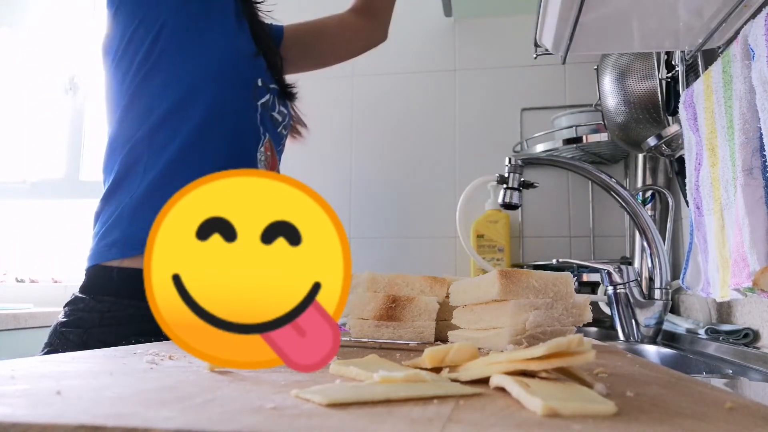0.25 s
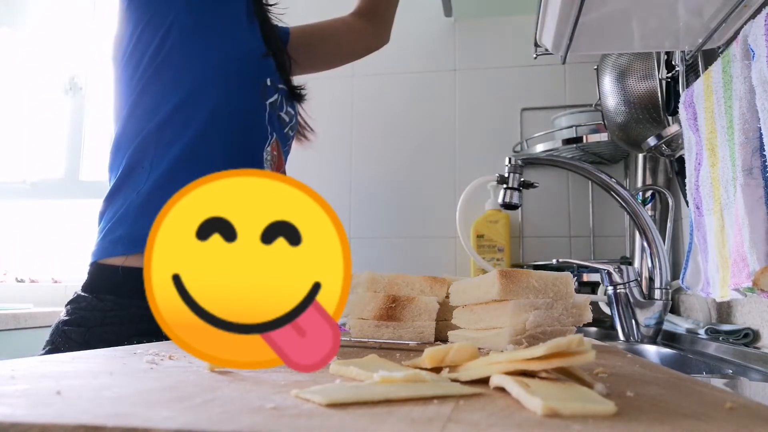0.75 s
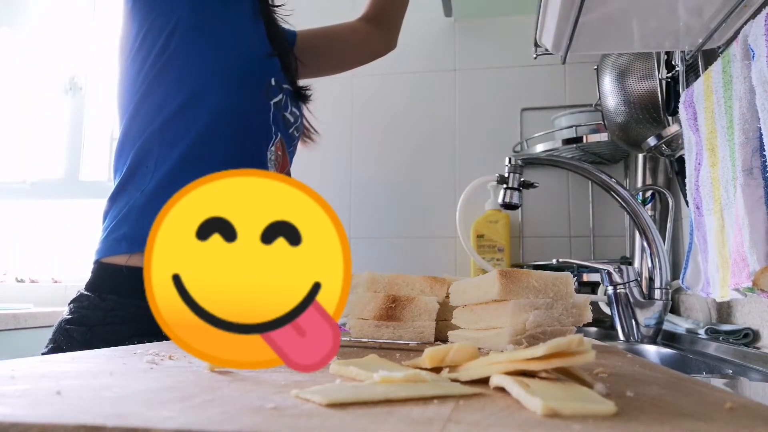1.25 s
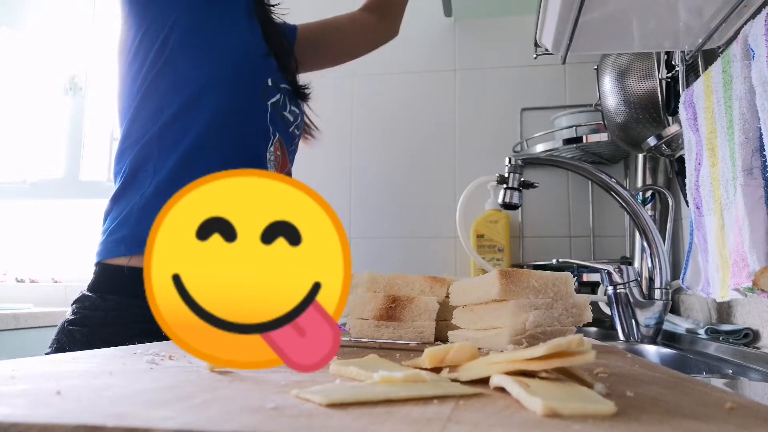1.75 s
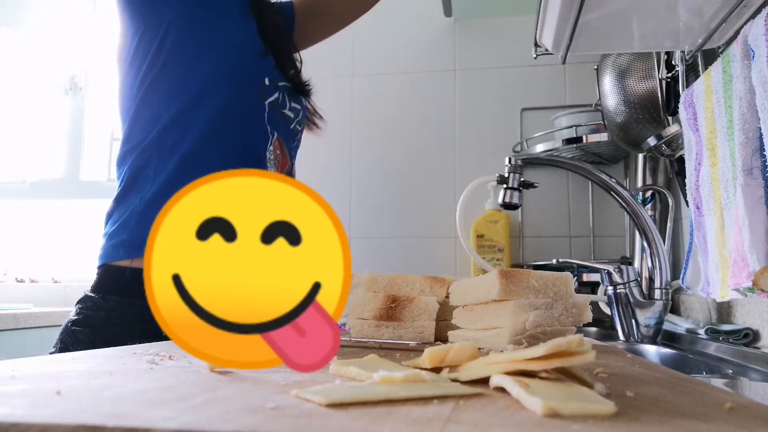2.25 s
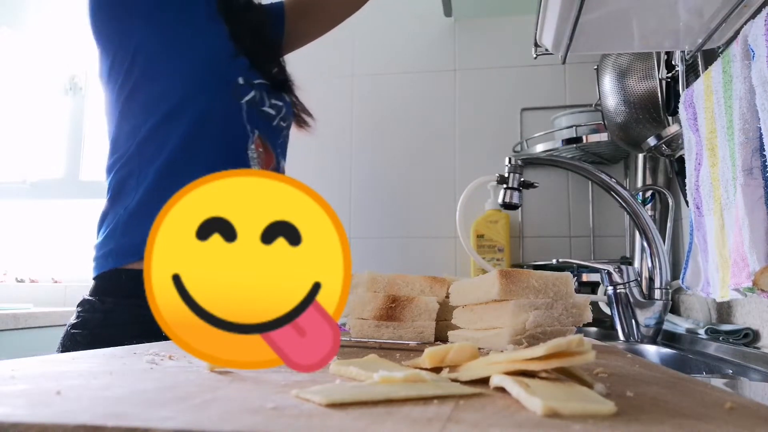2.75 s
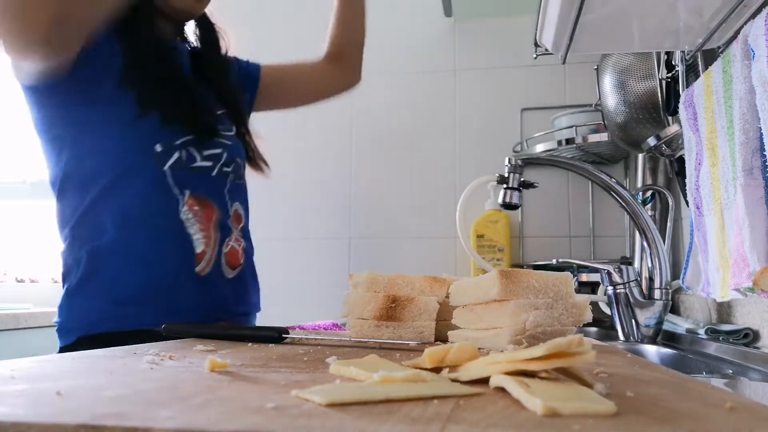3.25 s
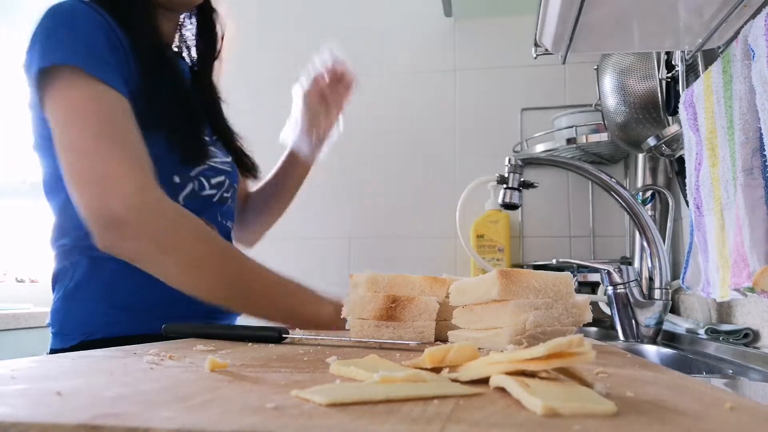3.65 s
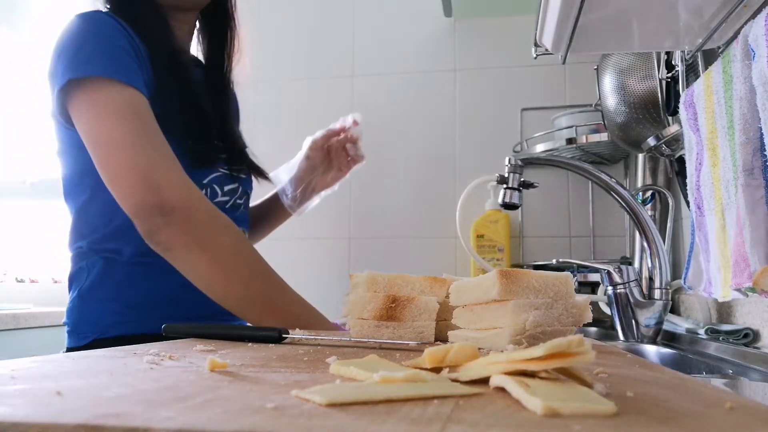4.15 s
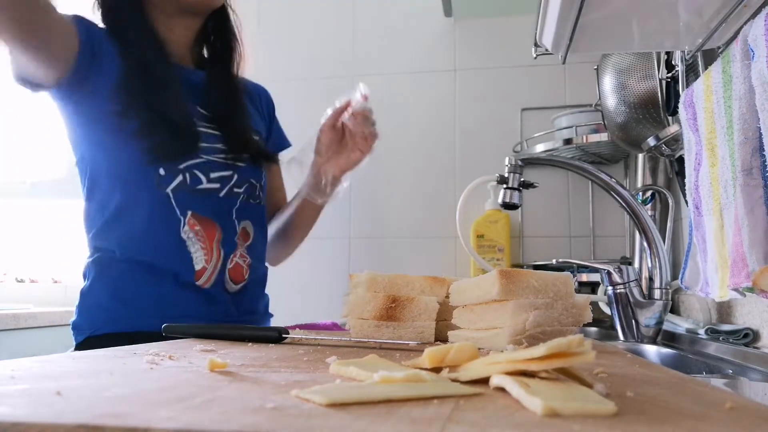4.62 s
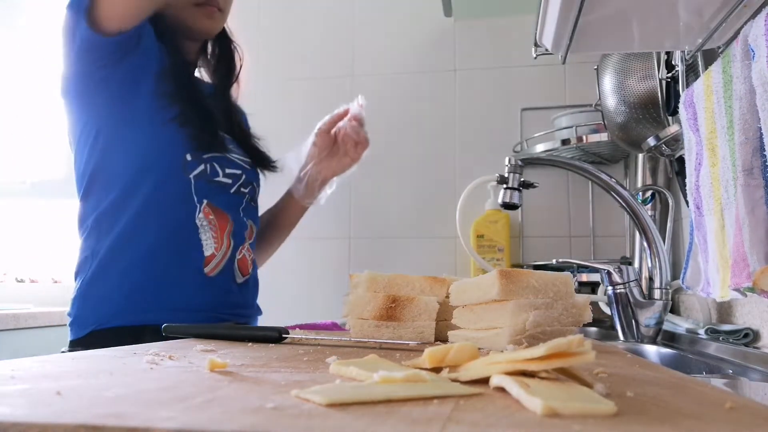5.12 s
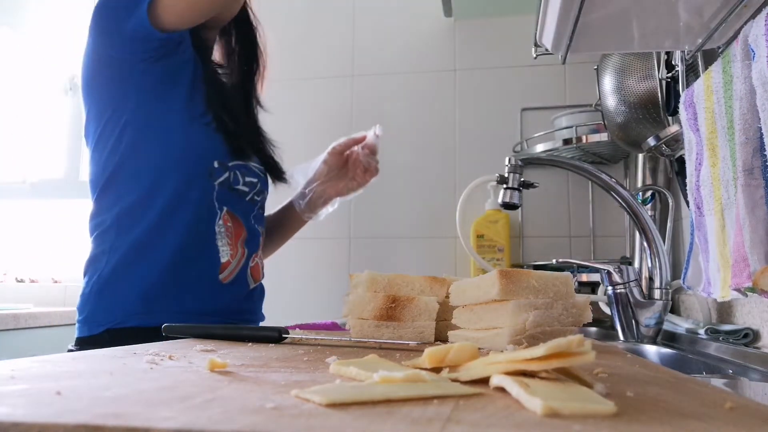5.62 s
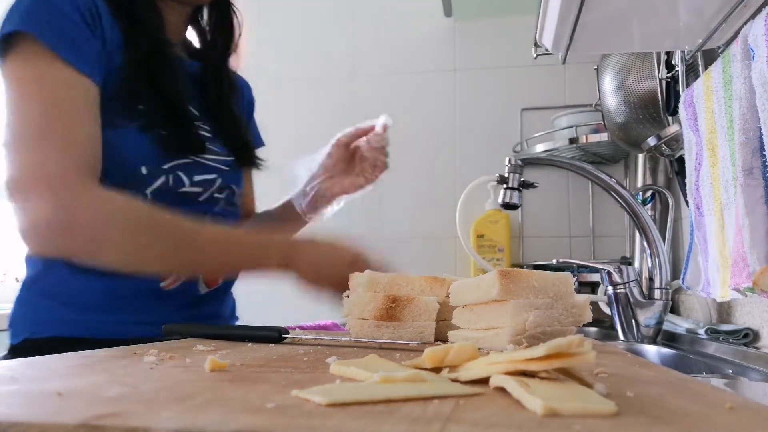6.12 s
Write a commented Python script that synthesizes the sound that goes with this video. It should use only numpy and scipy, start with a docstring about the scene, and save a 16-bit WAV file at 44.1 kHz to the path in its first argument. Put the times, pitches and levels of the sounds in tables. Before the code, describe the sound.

In a tiled home kitchen, metal clatters and rings free of a rack, is set down on wood, followed by clicks, knocks and glove rustle.

```python
"""Steel utensil in a tiled kitchen

A steel utensil is jostled in an overhead rack, drawn out singing and laid on a wooden board.
A shelf is bumped, a china dish nudged, something clicks, a cupboard door knocks, a thin plastic glove rustles.
Blows are chattering contacts on resonant bodies; slides and rustles are streams of tiny slips.
An appliance adds rushing air, a thin hiss and a low hum.
The blows, slides and rustles reach two microphones mostly by way of the walls."""
import sys
import numpy as np
from scipy import signal
from scipy.fft import rfft, irfft
from scipy.io import wavfile
from scipy.ndimage import uniform_filter1d, map_coordinates

SR = 44100
rng = np.random.default_rng(int(sys.argv[2]) if len(sys.argv) > 2 else 0)


def dump(signal):
    """Clip the signal to [-1, 1] and save it as 16-bit WAV at the path in sys.argv[1]."""
    limited = np.clip(np.atleast_2d(signal).T, -1, 1)
    pcm = np.round(limited * 32767).astype(np.int16)
    wavfile.write(sys.argv[1], SR, pcm)


N = 281358  # length in samples

# All levels in the tables are relative: body shapes are scaled to unit energy, layers have trims of their own.

# decay of the tiled walls: f/Hz, t60/s
WALL_DECAY = [(60, 0.99), (200, 0.43), (600, 0.4), (1500, 0.33), (4000, 0.33), (8000, 0.29), (14000, 0.2)]
# stereo balance over frequency, to which each path adds its pan: f/Hz, left minus right/dB
STEREO_LEAN = [(60, 2.5), (150, -7), (300, -6.5), (600, -7.5), (1200, 0), (3000, -6), (5200, 2.5),
               (9000, 1), (12000, -12.5)]
MIC_SPACING_M, TAIL = 0.17, 24000  # TAIL: length of the room's echo in samples
EDGE_HZ = 15200  # upper band limit

# rushing air of the still room: f/Hz, level/dB
AIR_COLOUR = [(12, -42), (20, -5.5), (102, -10), (119, -12), (149, 5.5), (201, -14.5), (216, -10.5),
              (292, -7.5), (315, -14), (366, -10), (520, -10), (561, -17), (703, -12), (1250, -24.5),
              (8000, -45), (10400, -126), (17600, -120)]
# thin steady hiss: f/Hz, level/dB
WHINE_COLOUR = [(20, -51), (8500, -22), (8950, 9.5), (9200, 15.5), (9500, 6), (9900, 1), (12000, -29),
                (15000, -4)]
AIR_DB, WHINE_DB = -47, -72
# the appliance's motor tones: f/Hz, level/dB
HUM_TONES = [(100, -62.5), (146, -72.5), (194, -58.5), (292, -58.5)]

# movements of the gloved hand: t/s, level/dB, attack/s, release/s
GLOVE_GESTURES = [(0.0, -57, .01, 0.28), (1.56, -71, 0.13, 0.34), (1.91, -58.5, 0.19, 0.44),
                  (2.2, -63, 0.11, 0.23), (3.09, -63.5, 0.094, .7), (3.35, -71, .1, 2),
                  (6.0, -70.5, 0.18, 1.1), (6.117, -39.5, 0.04, 0.094)]
# colour of crinkling plastic: f/Hz, level/dB
CRINKLE_COLOUR = [(200, -17), (600, 8.5), (1500, -1.5), (3000, 0), (5500, -2), (8000, -5), (11000, -1.5),
                  (13000, -14.5), (15000, -16)]
GLOVE_REST_DB, GLOVE_HANDLING_DB, GLOVE_TRIM_DB = -74, -50, 1  # it never lies quite still

# blows, one table for each thing: t/s, level/dB, chatter/s, bass tilt/dB, treble tilt/dB
SHELF_BLOWS = [(1.8325, -20.5, 0.0052, 5.5, 8), (1.891, -27.5, 0.0039, -4.5, 8),
               (1.938, -56, 0.0027, -12, -8), (2.018, -21.5, 0.0042, -11, -30)]
DOOR_BLOWS = [(0.012, -25.5, 0.023, -12, -6.5), (1.317, -37.5, 0.0046, 7.5, -8),
              (1.539, -45.5, 0.0027, 17, -36), (3.097, -42.5, 0.0093, 6, 2), (3.240, -46, 0.0011, 0, -29),
              (5.467, -15, 0.0057, -3.5, 1.5), (5.620, -42, 0.013, -8, 23), (5.634, -17, 0.0091, 4, 8.5),
              (5.69, -36.5, 0.045, 11, -22)]
CHINA_BLOWS = [(2.832, -40.5, 0.0061, 0.0014, -22), (2.872, -31, 0.0034, 0, 6.5),
               (2.896, -30, 0.0045, 0, 2), (2.937, -37.5, 0.0017, 0.0049, -1)]
CLICK_BLOWS = [(4.843, -33.5, 0.011, 0, 1), (4.8475, -29, 0.0072, 0, -0.5)]
# small hollow tick just before the click, same columns
TICK_BLOWS = [(4.8155, -35.5, 0.0021, -2, -14)]
# resonances of shelf, door, china and tick: f/Hz, width/Hz, level/dB
SHELF_RINGS = [(112.4, 4.8, 2), (238, 9.3, 2.5), (308.7, 14, -2), (434, 71, -12), (532, 36, 2),
               (642, 12, -14)]
DOOR_RINGS = [(105.4, 11, 7.5), (300, 95, 5), (368, 20, 12.5), (445, 130, 5.5), (650, 49, 8.5),
              (896, 29, 2), (1240, 160, -23), (1310, 62, -14.5), (1440, 46, -13), (2140, 130, -11)]
CHINA_RINGS = [(546, 130, 1), (870, 130, -5), (1090, 37, -1.5), (1800, 5.5, -3), (3030, 6.6, -15.5),
               (4500, 42, -34)]
TICK_RINGS = [(1183, 44, 7), (1300, 70, -20)]
# broad colour of shelf, door, china and click: f/Hz, level/dB
SHELF_COLOUR = [(40, -30), (75, -11), (105, 0), (170, -15), (250, 9.5), (400, -8), (640, -2), (800, -26),
                (1100, -23.5), (2500, -34), (5000, -55), (12000, -94)]
DOOR_COLOUR = [(30, -18), (60, -17.5), (105, -3), (190, -10.5), (300, -20.5), (480, -3), (650, -5.5),
               (920, -6), (1650, -16.5), (2500, -28), (3700, -34.5), (4800, -48), (7300, -49.5),
               (15000, -81)]
CHINA_COLOUR = [(100, -17), (400, -3), (600, 7), (1100, -1), (1600, -38), (4000, -42), (10000, -66)]
CLICK_COLOUR = [(410, -8.5), (700, -6), (1070, -4), (1670, -9.5), (2560, 2), (3480, -7), (4920, -4.5),
                (7220, -11.5), (8980, -22), (11300, -23.5), (15000, -55)]

# the utensil lands on the board and is shoved into place: t/s, blow level/dB, drag level/dB, drag hold/s
BOARD_SHOVES = [(4.028, -18.5, -28.5, 0.048), (4.234, -25, -34, 0.042), (4.307, -24, -28.5, 0.016),
                (4.398, -28, -30, 0.022)]
# resonances of the wooden board: f/Hz, width/Hz, level/dB
BOARD_RINGS = [(34, 9.4, -12), (100, 6.9, 4), (296, 23, 9.5), (357, 71, 3), (429, 19, 3), (538, 10, 2.5),
               (802, 28, -5), (923, 52, -12), (1167, 40, -12)]
# broad knock of the board: f/Hz, level/dB
BOARD_COLOUR = [(12, -42), (20, -3), (64, -44), (103, -12), (235, -32), (286, 10), (328, -17), (421, 1),
                (484, -24), (525, -1), (587, -10.5), (1050, -24), (1140, -19.5), (10800, -35), (15000, -53)]
# steel dragged on wood: f/Hz, level/dB
DRAG_COLOUR = [(100, -6), (200, -4.5), (320, -5), (560, -1.5), (1100, -10), (2000, -17), (5000, -26.5),
               (10500, -37), (15000, -57)]
# rumble of the worktop: f/Hz, level/dB
COUNTER_COLOUR = [(15, -7), (30, -3), (55, -23), (105, -7), (170, -20.5), (400, -40), (1500, -68)]
SHOVE_CHATTER_S, DRAG_ATTACK_S, DRAG_RELEASE_S = 0.0052, 0.004, 0.31
SHOVE_BASS_DB, SHOVE_TREBLE_DB = 3, -1
SETTLE_S, SETTLE_DB, SETTLE_TREBLE_DB = 0.036, -5, -33  # then the handle comes down, later and duller
HANDLING_S, HANDLING_RELEASE_S = 0.434, 0.21  # the hand stays on it this long after the landing
HANDLING_SLIP_DB, WORKTOP_DB = -40, -35

# modes of the utensil: f/Hz, width/Hz, clatter level/dB, edge-tap level/dB, slide level/dB
STEEL_RINGS = [(1076, 380, 7, -2, 8), (1358, 50, -3, -48, 10), (2175, 42, -26, -13, 12.5),
               (2209, 28, 5.5, 2.5, 9), (3120, 50, 4, -24, -11), (3380, 19, 0, 10.5, 12.5),
               (3475, 14.3, 3, 14.5, 5), (3686, 38, -4.5, 3, -21), (3803, 50, 4, -6, -16),
               (4540, 25, -1, -58, 2.5), (4620, 79, 3.5, -27, -11), (5120, 36, 0.5, 3, 11),
               (4800, 17, -34, -27, -45), (6540, 29, 1, -35, -21), (6920, 35, -4, -22, -29),
               (7190, 19, 0, -5, -3), (7250, 25, -28, -28, -18), (8560, 33, -8.5, -21, -21),
               (9600, 29, -7.5, -13, -7.5), (9860, 16, -14, -19, -23), (10650, 120, -19.5, -25, -13),
               (11200, 33, -43, -30, -16), (12110, 31, -21, -26, -18), (12850, 17, -39, -34, -31),
               (13850, 40, -48, -51, -44)]
# bare contact of steel: f/Hz, level/dB
CLACK_COLOUR = [(300, -35.5), (900, 20), (1700, 14.5), (2700, 9.5), (3700, 2), (4200, -36), (5400, 4),
                (7400, -15), (8100, -53), (10500, -48), (12500, -38), (13400, -106)]
# broad knock of the rack: f/Hz, level/dB
RACK_COLOUR = [(30, -43), (70, -20), (110, -3.5), (190, -17.5), (300, 0.5), (560, 0), (760, -1.5),
               (1000, -17.5), (1600, -18.5), (3000, -59), (8000, -89)]
# resonances of the rack: f/Hz, width/Hz, level/dB
RACK_RINGS = [(322, 33, -2), (462, 23, -10), (540, 30, 2.5), (616, 44, 0), (746, 54, -17), (994, 81, -1.5)]
# the utensil is jolted, strikes the rack and rebounds:
# t/s, thud level/dB, ring level/dB, time to the rebound/s, rebound level/dB
RACK_JOLTS = [(0.190, -39, -70, .02, -15), (0.229, -33.5, -50, .018, 1.5), (0.342, -33.5, -46, 0.016, 5),
              (0.364, -24.5, -26.5, 0.013, 0.5), (0.469, -22.5, -34.5, .027, 2.5),
              (0.629, -28.5, -39, 0.034, -6), (0.724, -28.5, -44, .013, -2), (0.737, -28, -33, 0.017, -9),
              (0.835, -24, -35, .028, -4.5), (0.902, -26.5, -37.5, 0.018, 0),
              (1.006, -33.5, -55.5, 0.024, 1.5), (1.076, -31.5, -54, 0.017, -7),
              (1.189, -41, -61, 0.015, -3)]
# the utensil's edge is tapped: t/s, thud level/dB, ring level/dB, clack level/dB, chatter/s
EDGE_TAPS = [(2.019, -22.5, -26.5, -33, 0.014), (2.056, -32.5, -32.5, -34.5, 0.0048)]
STRIKE_CHATTER_S, REBOUND_CHATTER_S = 0.0075, 0.011
REBOUND_THUD_DB, REBOUND_RING_DB = -2, 3.5  # the rebound is lighter on the rack and brighter on the steel
JOLT_RING_DB, JOLT_CLACK_DB = -1, -3  # trims on the ring level of a jolt
EDGE_AT_FIRST, EDGE_PER_S = 0.07, 0.38  # worked loose, it turns onto its edge (share 0-1)
# rubbing on the rack between jolts: t/s, attack/s, hold/s, release/s
RUB_TIMING = (.68, .08, .26, .4)
RUB_DB, RUB_STEEL_DB = -40.5, -9  # overall level; steel against rack

# drawn out in one stroke: t/s, effort level/dB
DRAW_STROKE = [(2.22, -52), (2.336, -39.5), (2.454, -24.5), (2.55, -22.5), (2.584, -28.5), (2.618, -28),
               (2.72, -66)]
# the tip drags over the rim: t/s, attack/s, hold/s
RIM_DRAG = (2.54, .012, .045)
RIM_DB, RIM_RELEASE_S, RIM_SONG_DB = -34, 0.31, 1
SING_DB, SING_FOLLOWS = -36, 0.55  # singing at full effort, and its dB per dB of effort
SCRAPE_DB, SCRAPE_FOLLOWS = -42.5, 0.9  # the same for the scraping
BARE_SCRAPE_DB, RUMBLE_DB = -4, -24  # bare contact against ringing scrape; rumble at full effort
RUMBLE_PITCH, RUMBLE_SAG_PER_S = 1.3, 1.3  # pitch factor of the rack as the stroke starts, and its fall
SONG_BEND = 0.015  # power of the rumble's pitch factor that the song follows


def amp(db):
    """Turns decibels into a gain."""
    return 10 ** (np.asarray(db) / 20)


def unit(x):
    """Scales to an energy of one."""
    return x / np.sqrt(np.sum(x ** 2) + 1e-20)


def read(points, hz):
    """Reads a curve between its points on a logarithmic frequency axis."""
    f, value = np.transpose(points)
    return np.interp(np.log(hz + 1), np.log(f + 1), value)


def add(mix, s, sound):
    """Lays a sound into the mix at s seconds."""
    part = mix[max(round(s * SR), 0):][:len(sound)]
    part += sound[:len(part)]


def wander(per_s):
    """A random curve of straight segments, with so many knots a second."""
    knots = np.arange(0, N + SR, SR / per_s)
    return np.interp(np.arange(N), knots, rng.standard_normal(len(knots)))


def gesture(s, db, attack_s, hold_s, release_s):
    """A gain that rises until s, holds, then dies by 60 dB over the release."""
    t = np.arange(N) / SR - s
    rise = np.clip(1 + t / max(attack_s, 1e-3), 0, 1)
    fall = np.exp(-np.log(1000) * np.maximum(t - hold_s, 0) / max(release_s, 1e-3))
    return amp(db) * rise * fall


def colour(points, size=4096):
    """The causal (minimum-phase) response that has a given spectrum."""
    hz = abs(np.fft.fftfreq(size, 1 / SR))
    log_gain = np.log(amp(np.maximum(read(points, hz), -100)))
    return unit(np.fft.ifft(np.exp(signal.hilbert(log_gain).conj())).real)


def ring(modes, detune=0., size=12000):
    """Resonances that build within a cycle and die; where a thing is touched shifts each of them a little."""
    hz, width, db = np.transpose(modes)[:, :, None]
    t = np.arange(size) / SR
    shift = 1 + detune * rng.standard_normal(hz.shape)
    envelope = (1 - np.exp(-2 * hz * t)) * np.exp(-np.pi * width * t)
    # weighting by width makes the level that of the spectral peak
    partials = amp(db) * width * envelope * np.sin(2 * np.pi * hz * shift * t)
    return unit(np.sum(partials, 0))


def body(points, modes, ring_db):
    """A broad knock together with the resonances that stand out of it."""
    response = amp(ring_db) * ring(modes)
    add(response, 0, colour(points))
    return unit(response)


def whiten(x, size):
    """Evens out a random response so that it favours no band."""
    z = rfft(x, 2 * x.shape[-1])
    smooth_power = uniform_filter1d(abs(z) ** 2, size)
    return irfft(z / np.sqrt(smooth_power + 1e-12))[..., :x.shape[-1]]


def grit(per_s, size):
    """Tiny contacts of random size at random moments."""
    return rng.standard_normal(size) * (rng.random(size) < per_s / SR)


def contact(chatter, size=6000):
    """One touch and the dying chatter of small bounces behind it."""
    chatter = max(chatter, 1e-3)
    bounces = unit(grit(3000, size) * np.exp(-np.arange(size) / SR / chatter))
    bounces[0] += 0.0063 / chatter  # the shorter the chatter, the more the first touch stands out
    return unit(whiten(bounces, size=60))


def blow(response, db, chatter):
    """A blow on a body; its level is the mean over 36 ms, since the room spreads the energy."""
    return amp(db) * np.sqrt(0.036 * SR) * unit(signal.fftconvolve(contact(chatter), response))


def knocks(rows, response):
    """Heavy blows bring out the bass of a thing, hard ones its treble."""
    out = np.zeros(N)
    for s, db, chatter, bass_db, treble_db in rows:
        touch = colour([(110, bass_db), (350, 0.023), (1200, 0.016), (5000, treble_db)], size=1024)
        add(out, s, blow(signal.fftconvolve(response, touch), db, chatter))
    return out


def rub(response, per_s, clump_db=-1.0):
    """A stream of tiny slips, coming in clumps, excites a thing."""
    slips = grit(per_s, N) * amp(clump_db * wander(per_s=120))
    return signal.oaconvolve(unit(slips) * np.sqrt(N), response)[:N]


def glide(x, factor):
    """Bends every resonance of a steady sound by reading it at a varying speed."""
    return map_coordinates(x, [np.cumsum(factor)], order=3, mode="wrap")


def two_ports(z, hz):
    """Sound from all sides is alike at both microphones only where its waves are long."""
    same = np.sinc(2 * hz * MIC_SPACING_M / 343)  # 343 m/s: speed of sound
    shared, apart = np.sqrt(1 + same) * z[0], np.sqrt(1 - same) * z[1]
    return np.array([shared + apart, shared - apart]) / np.sqrt(2)


def kitchen(x, early_db, pan_db, early_s=0.014, direct_db=-14):
    """One path across the room: direct sound, strong first reflections, then the tail of the tiled walls."""
    t, hz = np.arange(TAIL) / SR, np.fft.rfftfreq(TAIL, 1 / SR)
    taps = np.array([grit(5000, TAIL), grit(5000, TAIL)]) * (1 + amp(early_db) * np.exp(-t / early_s))
    # each band dies at the rate of the walls
    f, when, z = signal.stft(taps, SR, nperseg=256)
    decay = amp(-60 * when / read(WALL_DECAY, f)[:, None])
    taps = unit(signal.istft(z * decay, SR, nperseg=256)[1][:, :TAIL])
    taps[0, 0] += amp(direct_db)  # direct sound, in the part both microphones share
    taps = whiten(irfft(two_ports(rfft(whiten(taps, size=60)), hz)), size=60)
    # half the balance to each side
    taps = irfft(rfft(taps) * amp(np.outer([.5, -.5], read(STEREO_LEAN, hz) + pan_db)))
    taps *= np.minimum(1, 8 * (1 - t / t[-1]))  # fade over the last eighth
    return signal.oaconvolve(x[None], unit(taps) * np.sqrt(2), axes=1)[:, :N]


def appliance(waver_rad=1.0):
    """Steady rush of air and thin hiss as shaped noise, and a motor hum of sines with wavering phase."""
    hz, t = np.fft.rfftfreq(N, 1 / SR), np.arange(N) / SR
    air_shape = amp(AIR_DB) * unit(amp(read(AIR_COLOUR, hz)))
    hiss_shape = amp(WHINE_DB) * unit(amp(read(WHINE_COLOUR, hz)))
    noise = rfft(rng.standard_normal((2, N)))
    air = irfft(two_ports(noise, hz) * (air_shape + hiss_shape), N) * np.sqrt(len(hz))
    knots = np.linspace(0, t[-1], 40)
    hum = np.zeros(N)
    for f, db in HUM_TONES:
        drift = waver_rad * np.interp(t, knots, rng.standard_normal(len(knots)))
        hum += amp(db) * np.sqrt(2) * np.sin(2 * np.pi * f * t + drift)
    return air + hum


def handling():
    """How firmly the hand works on the board, from the landing until it lets go."""
    return gesture(BOARD_SHOVES[0][0], 0, 0.012, HANDLING_S, HANDLING_RELEASE_S)


def glove():
    """Thin plastic crinkles in tiny slips as the hand moves, and all the while it works on the board."""
    motion = amp(GLOVE_REST_DB) + amp(GLOVE_HANDLING_DB) * handling()
    for s, db, attack, release in GLOVE_GESTURES:
        motion = motion + gesture(s, db, attack, 0, release)
    crinkle = rub(colour(CRINKLE_COLOUR), per_s=2500, clump_db=-1.5)
    return kitchen(amp(GLOVE_TRIM_DB) * motion * crinkle, early_db=15, pan_db=6.0)


def lay_down():
    """Each shove knocks on the board, settles and drags over it; the worktop rumbles under the hand."""
    board = body(BOARD_COLOUR, BOARD_RINGS, ring_db=-3.5)
    landings, settlings, drag = [], [], np.zeros(N)
    for s, blow_db, drag_db, hold in BOARD_SHOVES:
        landings.append((s, blow_db, SHOVE_CHATTER_S, SHOVE_BASS_DB, SHOVE_TREBLE_DB))
        settlings.append((s + SETTLE_S, blow_db + SETTLE_DB, SHOVE_CHATTER_S, SHOVE_BASS_DB, SETTLE_TREBLE_DB))
        drag += gesture(s + DRAG_ATTACK_S, drag_db, DRAG_ATTACK_S, hold, DRAG_RELEASE_S)
    blows = knocks(landings, board) + knocks(settlings, board)
    drag_gain = drag + amp(HANDLING_SLIP_DB) * handling()
    dragging = drag_gain * rub(body(DRAG_COLOUR, BOARD_RINGS, ring_db=-2), per_s=700, clump_db=2.5)
    rumble = amp(WORKTOP_DB) * handling() * rub(colour(COUNTER_COLOUR), per_s=430, clump_db=-7.5)
    return blows + dragging + rumble


def dishes():
    """Blows on shelf, board, cupboard door and china, and a click, each along its own path in the room."""
    shelf = knocks(SHELF_BLOWS, body(SHELF_COLOUR, SHELF_RINGS, ring_db=1.0))
    door = knocks(DOOR_BLOWS, body(DOOR_COLOUR, DOOR_RINGS, ring_db=-6))
    china = knocks(CHINA_BLOWS, body(CHINA_COLOUR, CHINA_RINGS, ring_db=-2.5))
    click = knocks(CLICK_BLOWS, colour(CLICK_COLOUR)) + knocks(TICK_BLOWS, ring(TICK_RINGS))
    return (kitchen(shelf, early_db=7.5, pan_db=5.0, early_s=0.02, direct_db=-28)
            + kitchen(lay_down(), early_db=14.5, pan_db=1, direct_db=-15.5)
            + kitchen(door, early_db=-0.5, pan_db=3.5, direct_db=-11.0)
            + kitchen(china, early_db=6, pan_db=2)
            + kitchen(click, early_db=10, pan_db=4))


def steel_modes():
    """The utensil's modes as they sound when clattering, tapped on the edge and sliding."""
    hz, width, *levels = np.array(STEEL_RINGS, float).T
    return [np.column_stack([hz, width, db]) for db in levels]


def jostle():
    """Light rubbing of steel on the rack while it is worked loose."""
    flat, edge, _ = steel_modes()
    steel = rub(ring((flat + edge) / 2), per_s=520)
    rack = rub(body(RACK_COLOUR, RACK_RINGS, ring_db=12), per_s=650)
    start, *shape = RUB_TIMING
    return gesture(start, RUB_DB, *shape) * (rack + amp(RUB_STEEL_DB) * steel)


def clatter():
    """Each touch thuds in the rack and rings the steel; jolts never ring twice with quite the same colour."""
    flat, edge, _ = steel_modes()
    rack, clack = body(RACK_COLOUR, RACK_RINGS, ring_db=-6.5), colour(CLACK_COLOUR)
    out = np.zeros(N)
    for start, thud_db, ring_db, gap, rebound_db in RACK_JOLTS:
        share = np.clip(EDGE_AT_FIRST + EDGE_PER_S * (start - RACK_JOLTS[0][0]), 0, 1)
        strike = (start, thud_db, ring_db, STRIKE_CHATTER_S)
        rebound = (start + gap, thud_db + rebound_db + REBOUND_THUD_DB,
                   ring_db + rebound_db + REBOUND_RING_DB, REBOUND_CHATTER_S)
        for s, thud, bright, chatter in (strike, rebound):
            modes = flat + share * (edge - flat)
            modes[:, 2] += 3.5 * rng.standard_normal(len(modes))  # dB of chance in each mode
            add(out, s, blow(rack, thud, chatter))
            add(out, s, blow(ring(modes, detune=0.0128), bright + JOLT_RING_DB, chatter))
            add(out, s, blow(clack, bright + JOLT_CLACK_DB, chatter))
    dull_clack = signal.fftconvolve(clack, colour([(1000, 0), (5500, 0), (8000, -11)], size=512))
    for s, thud_db, ring_db, clack_db, chatter in EDGE_TAPS:
        add(out, s, blow(rack, thud_db, chatter))
        add(out, s, blow(ring(edge, detune=0.0018), ring_db, chatter))
        add(out, s, blow(dull_clack, clack_db, chatter))
    return out


def slide():
    """Steel slides out singing and scrapes over the rim; the rumble sinks as the contact point moves."""
    flat, _, sliding = steel_modes()
    t = np.arange(N) / SR
    when, db = np.transpose(DRAW_STROKE)
    effort = amp(np.interp(t, when, db - db.max(), left=-150, right=-150))  # 1 at the strongest
    rim_start, *rim_shape = RIM_DRAG
    rim = gesture(rim_start, RIM_DB, *rim_shape, RIM_RELEASE_S)
    elapsed = np.clip(t, when[0], when[-1]) - when[0]
    pitch = RUMBLE_PITCH - RUMBLE_SAG_PER_S * elapsed
    song_pitch = pitch ** SONG_BEND * (1 + 0.011 * wander(per_s=30))
    sliding_rack = body(RACK_COLOUR, [(378, 33, -1.8), (513, 160, 0.61)], ring_db=6)
    rumble = glide(rub(sliding_rack, per_s=1100, clump_db=2), pitch)
    song = glide(rub(ring(sliding), per_s=1100, clump_db=8.5), song_pitch)
    bare_scrape = rub(colour(CLACK_COLOUR), per_s=1900, clump_db=11.5)
    scrape = rub(ring(flat), per_s=1100, clump_db=0.5) + amp(BARE_SCRAPE_DB) * bare_scrape
    song_gain = amp(SING_DB) * effort ** SING_FOLLOWS + amp(RIM_SONG_DB) * rim
    scrape_gain = amp(SCRAPE_DB) * effort ** SCRAPE_FOLLOWS + rim
    return amp(RUMBLE_DB) * effort * rumble + song_gain * song + scrape_gain * scrape


def utensil():
    """The rack is overhead, well away from the microphones; clatter and slide take their own paths."""
    return (kitchen(clatter() + jostle(), early_db=0.0, pan_db=3.5, direct_db=-10.5)
            + kitchen(slide(), early_db=10, pan_db=3.0, direct_db=-7.5))


def scene():
    """The whole kitchen at both microphones, from the background to the utensil."""
    return appliance() + glove() + dishes() + utensil()


def record(dry):
    """The recorder's band limit: a steep low-pass."""
    low_pass = signal.firwin(511, EDGE_HZ, window=("kaiser", 9), fs=SR)
    return signal.oaconvolve(dry, low_pass[None], "same")


dry = scene()
out = record(dry)
dump(out)
```